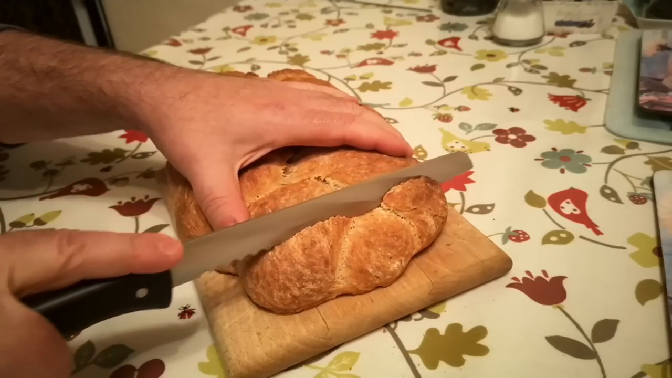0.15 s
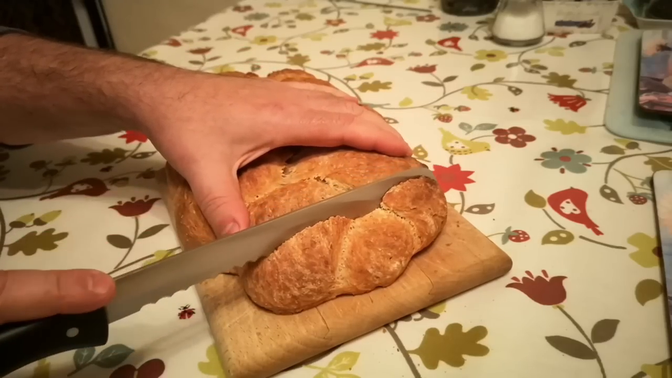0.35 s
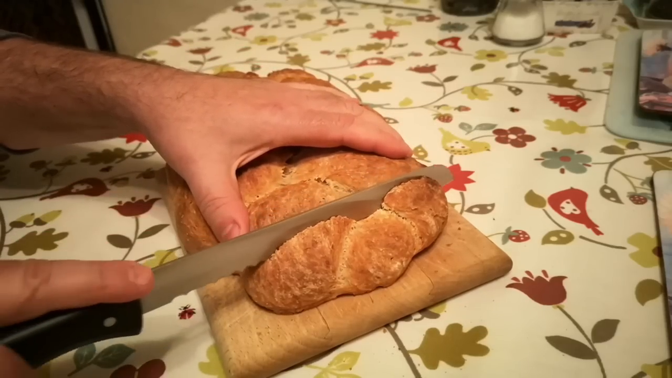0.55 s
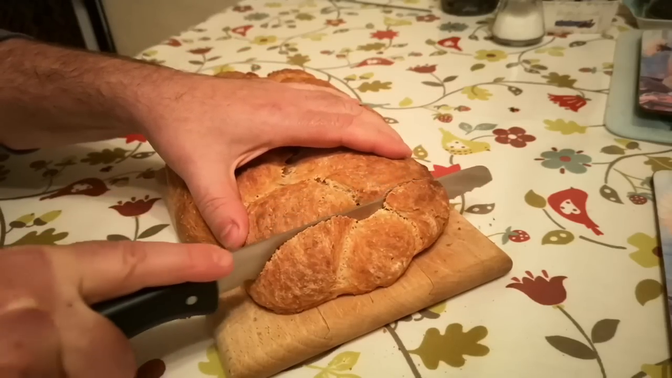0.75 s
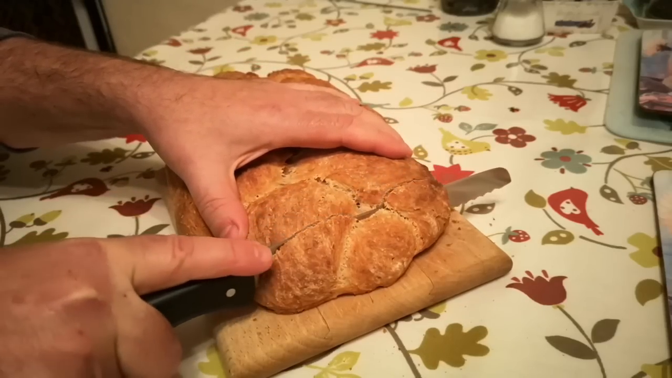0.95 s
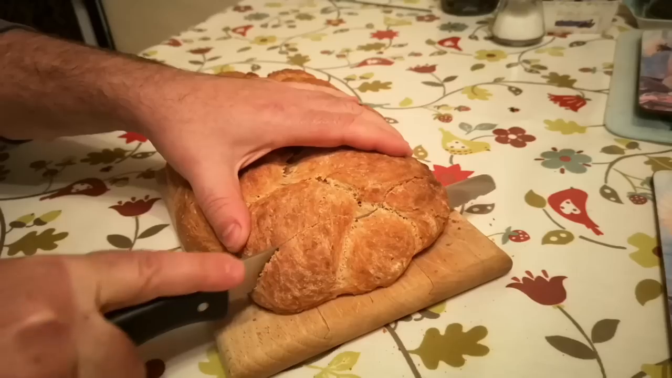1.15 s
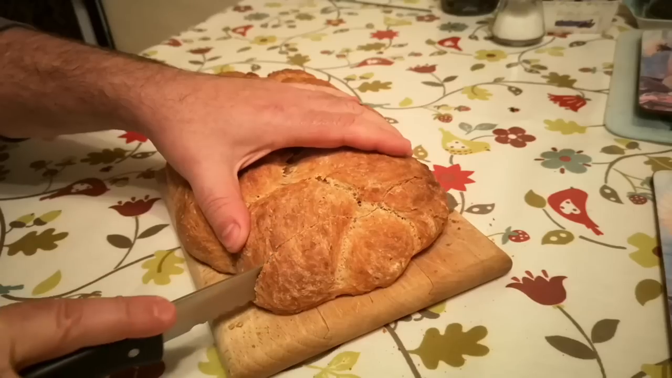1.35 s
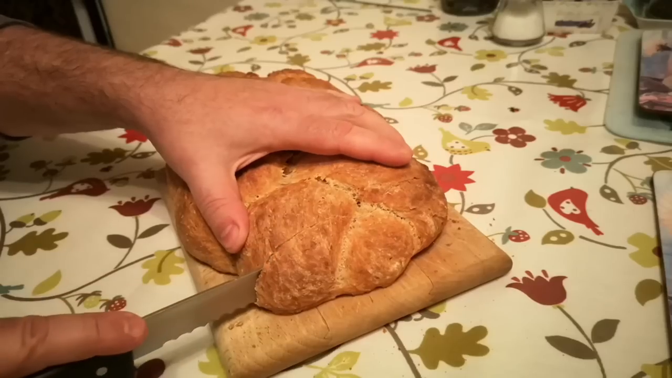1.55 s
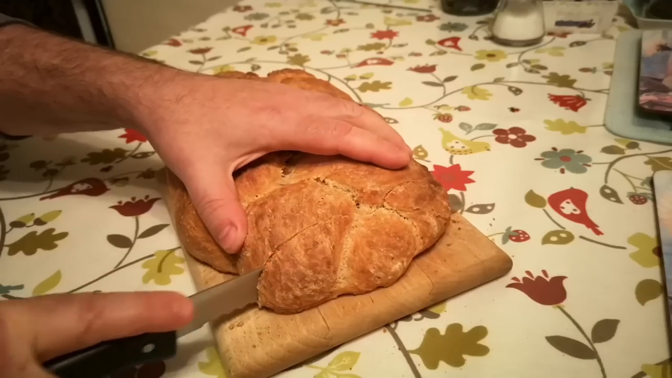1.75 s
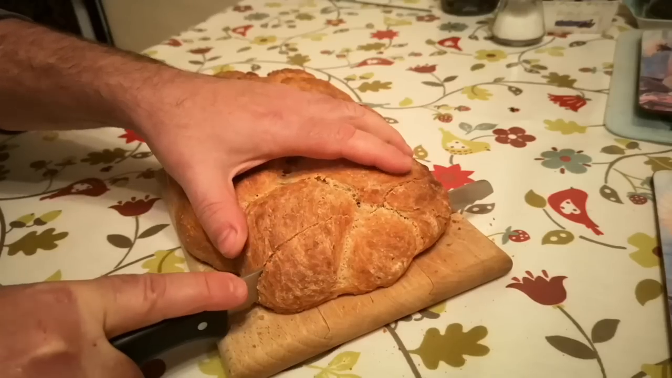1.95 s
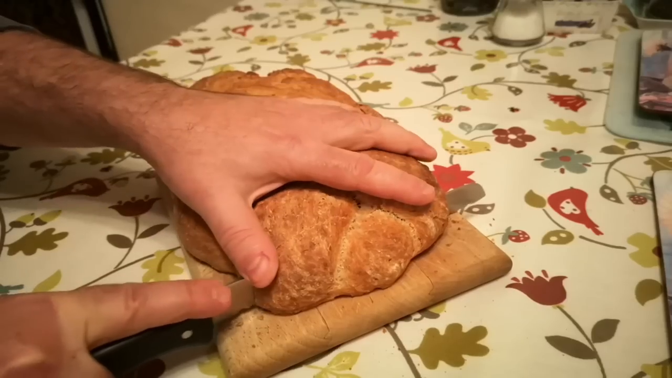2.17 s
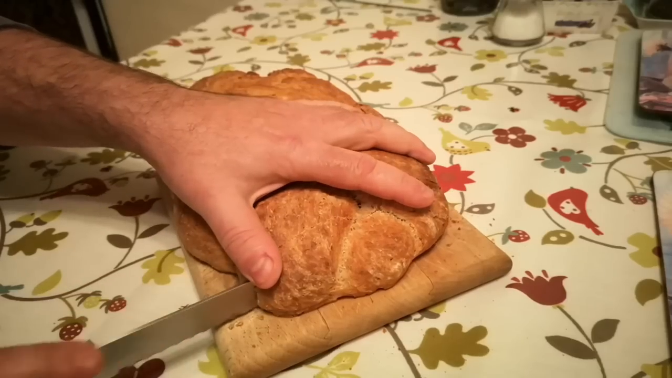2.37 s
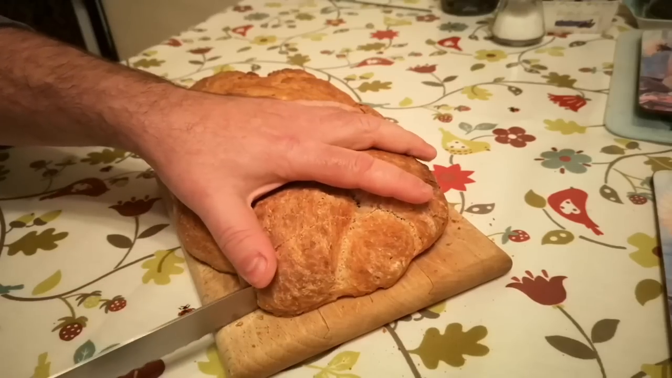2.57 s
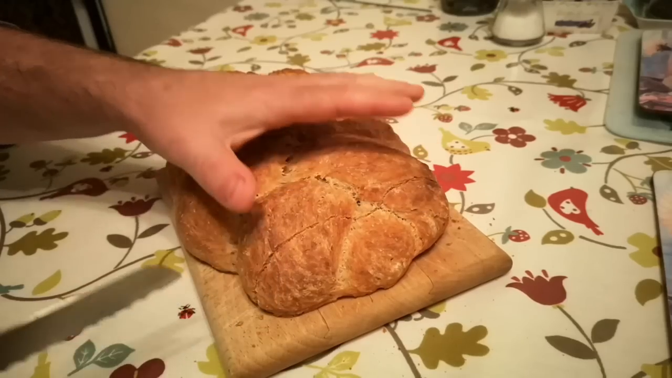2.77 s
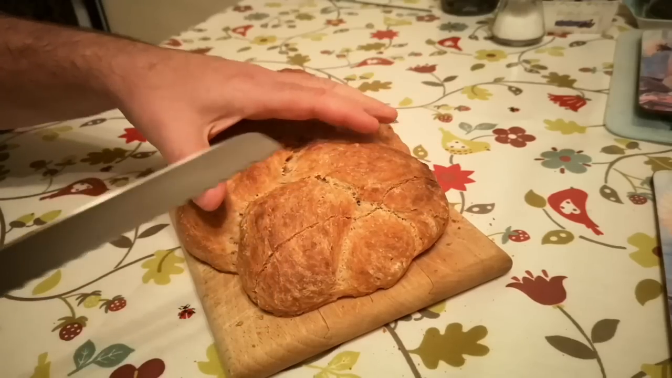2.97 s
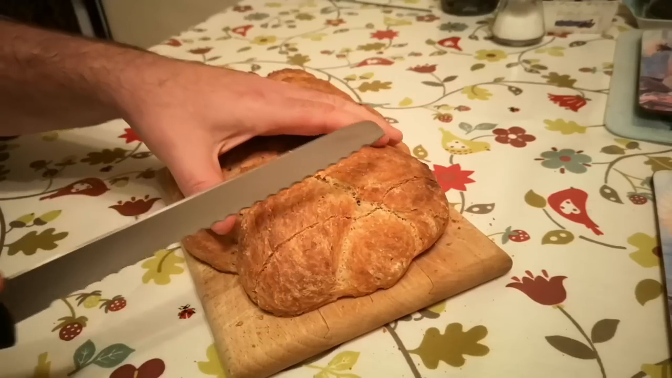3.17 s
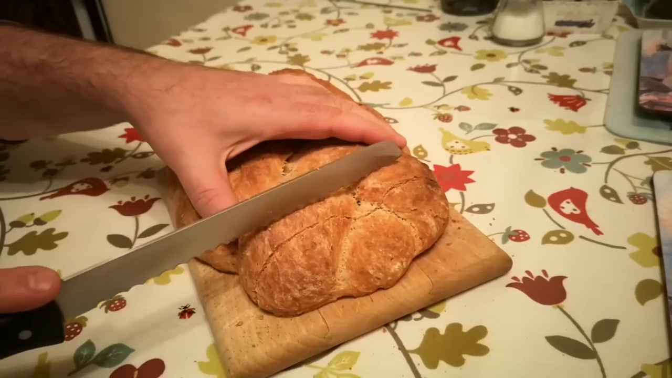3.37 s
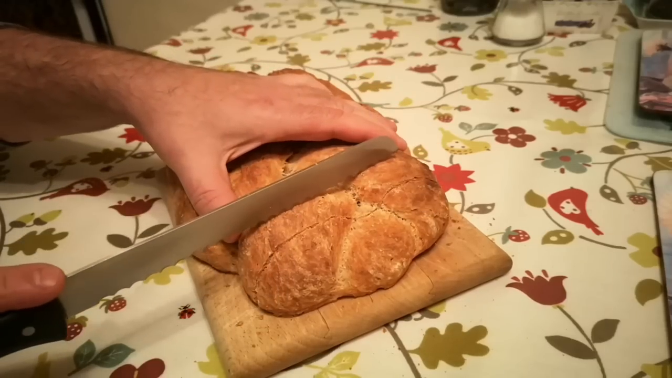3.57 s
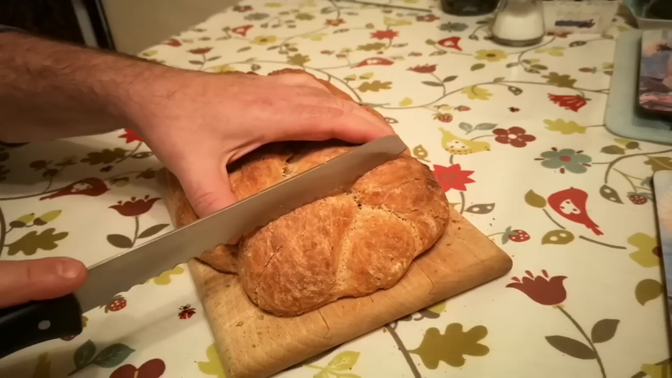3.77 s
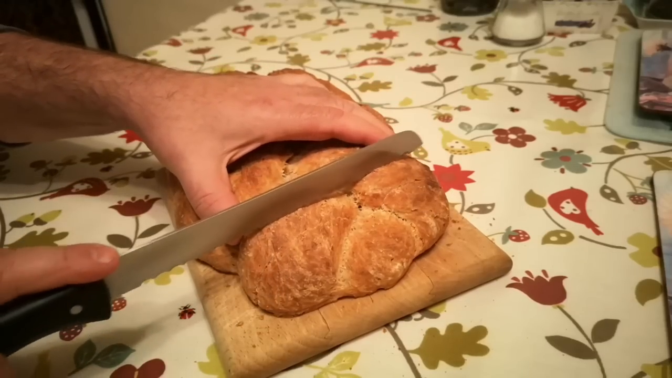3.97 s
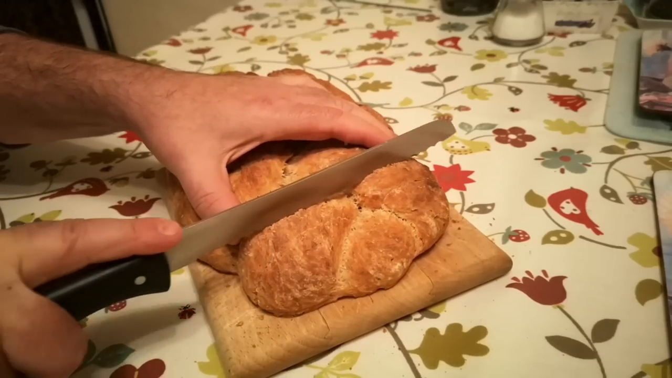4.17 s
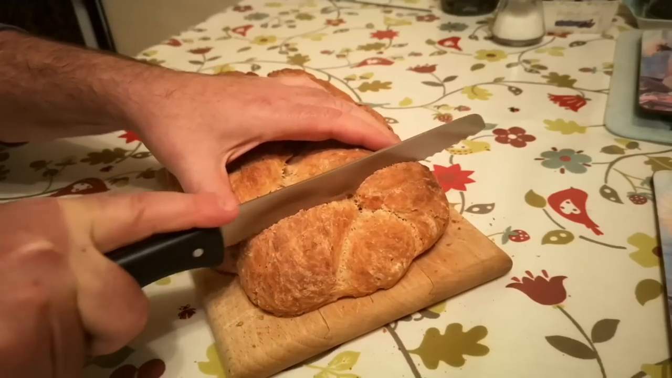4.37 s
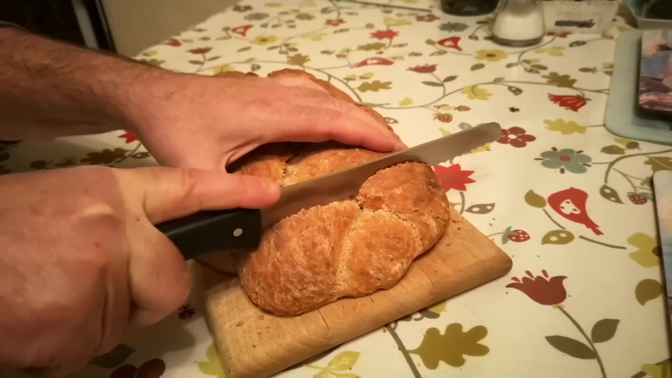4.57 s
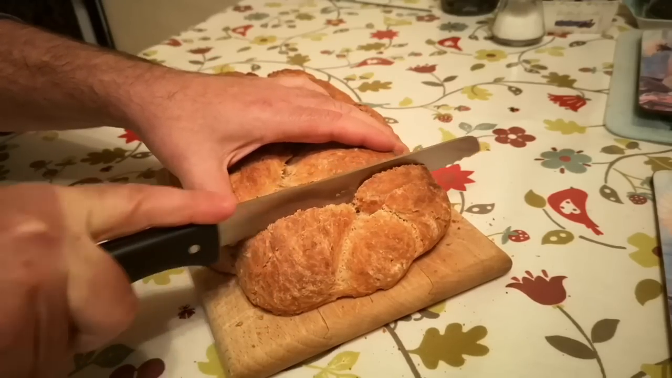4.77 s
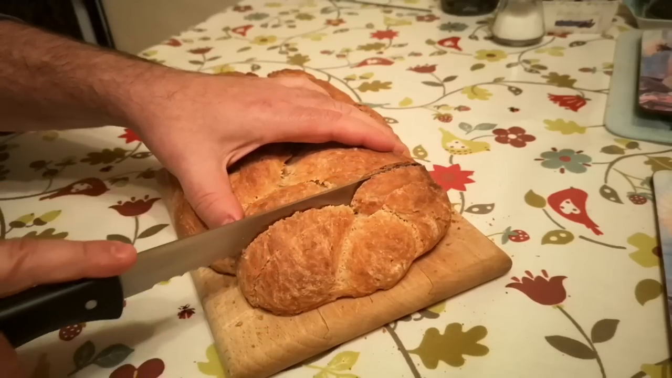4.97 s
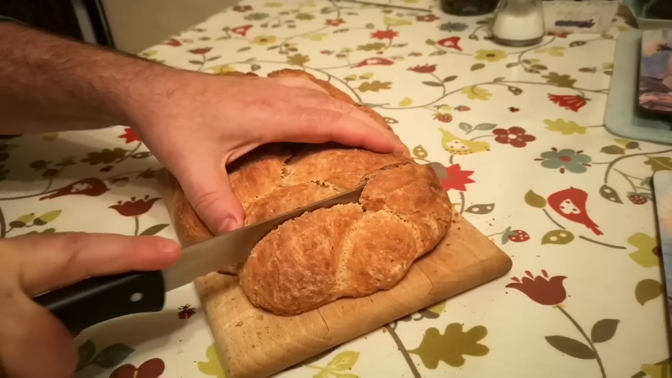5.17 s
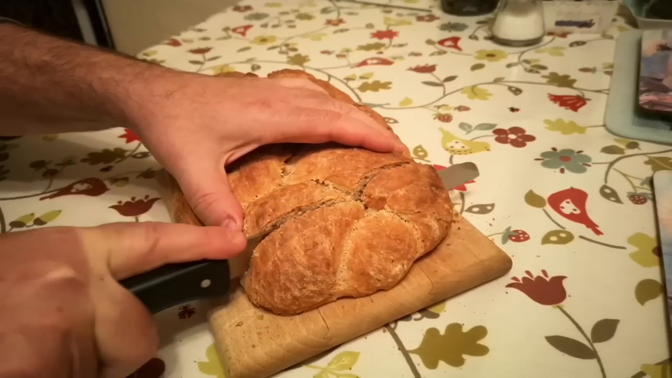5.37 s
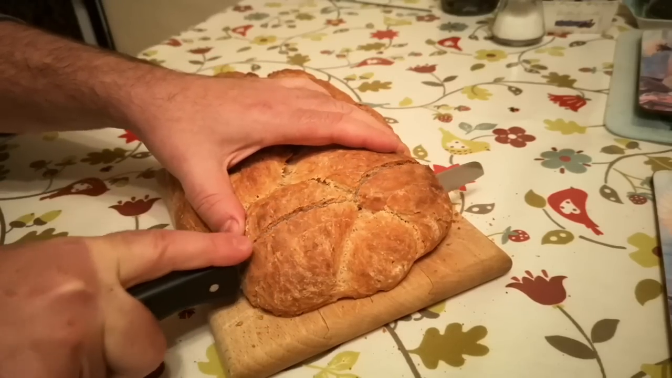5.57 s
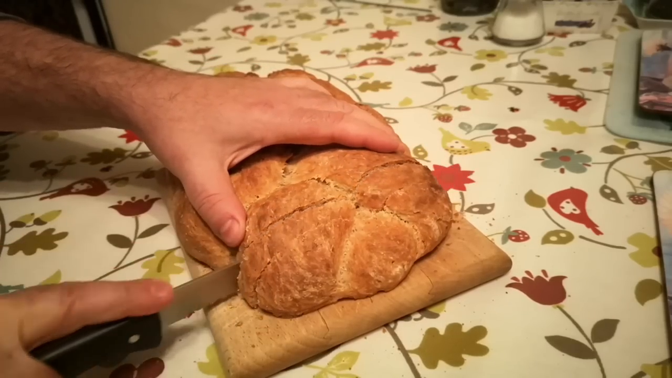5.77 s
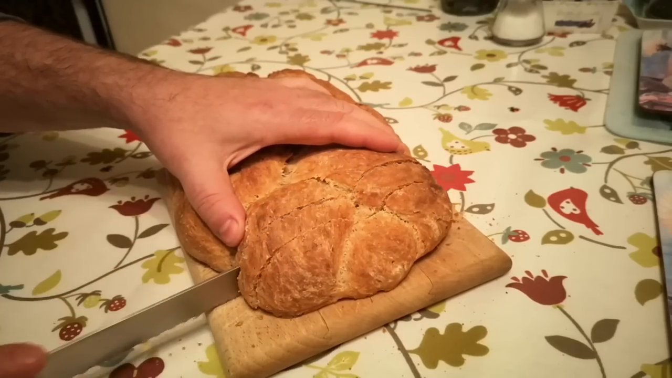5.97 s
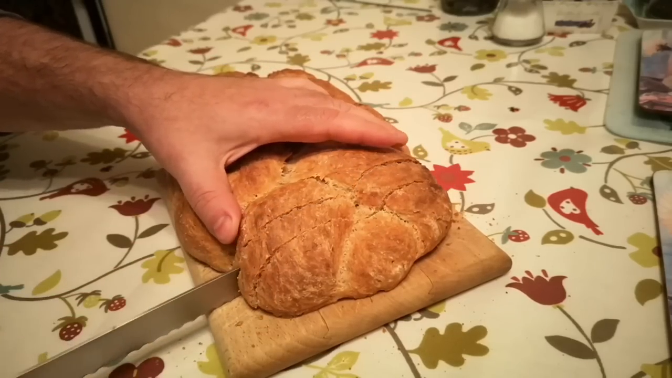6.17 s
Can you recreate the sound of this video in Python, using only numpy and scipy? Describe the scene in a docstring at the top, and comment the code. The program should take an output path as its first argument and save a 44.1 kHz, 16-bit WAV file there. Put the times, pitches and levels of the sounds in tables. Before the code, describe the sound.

Close up in a quiet kitchen, a serrated knife saws a crusty loaf on a wooden board. Crisp crackling strokes with sharp flake snaps come first, then softer rasping, a loud board knock at two seconds and a smooth hollow slide out. After a near-silent pause, a second cut crunches louder and fades into softer scraping.

```python
"""Sawing a crusty loaf

A serrated knife saws two cuts through a crusty loaf on a wooden board, close by in a quiet kitchen.
One train of random tooth catches drives showers of tiny cracks, the thrum of loaf and board, and a noisy rasp.
Noise bursts snap as larger flakes, crumbs tick, force pulses knock the board and resonators make the blade ring.
Deep in the cut the rasp turns smooth and hollow; reflections and soft noise place it all in the kitchen."""
import sys
import numpy as np
from scipy import signal
from scipy.io import wavfile
from scipy.ndimage import uniform_filter1d

SR = 44100
rng = np.random.default_rng(int(sys.argv[2]) if len(sys.argv) > 2 else 0)


def digitize_waveform(pressure):
    """Quantize a signal to 16-bit integers and store it at the path in sys.argv[1].

    Rows of a 2-D input are taken as channels; values are limited to [-1, 1].
    """
    field = np.atleast_2d(pressure).T
    bounded = np.clip(field, -1, 1)
    quanta = np.round(bounded * 32767).astype(np.int16)
    wavfile.write(sys.argv[1], SR, quanta)


N = 274522
TIME = np.arange(N) / SR


def gain_of(db):
    """Decibels to amplitude."""
    return 10 ** (np.asarray(db) / 20)


def evened(x):
    """Scales to rms 1."""
    return x / np.sqrt(np.mean(x ** 2) + 1e-20)


def peaked(x):
    """Scales to peak 1."""
    return x / (abs(x).max() + 1e-20)


def steadied(x, size=2000):
    """Holds the short-term rms near 1 and keeps the fast grain; size is in samples."""
    level = evened(x)
    power = uniform_filter1d(uniform_filter1d(level ** 2, size), size)
    return level / np.sqrt(abs(power) + 1e-4)


def blend(x, y, share):
    """Crossfades two sounds at even power."""
    share = np.clip(share, 0, 1)
    return np.sqrt(1 - share) * x + np.sqrt(share) * y


def read(points, hz):
    """Reads a spectrum or decay curve on a log-frequency axis."""
    f, value = np.transpose(points)
    return np.interp(np.log(hz + 1), np.log(f), value)


def follow(rows):
    """The columns of a curve table at every sample; the end values hold outside it."""
    s, *columns = np.transpose(rows)
    return [np.interp(TIME, s, column) for column in columns]


def swell(s, length_s):
    """A bell of height 1 around time s."""
    return np.exp(-2 * ((TIME - s) / length_s) ** 2)


def add(mix, s, sound):
    """Mixes a sound in at time s."""
    part = mix[max(round(s * SR), 0):][:len(sound)]
    part += sound[:len(part)]


def colour(x, points, size=8192):
    """Causal minimum-phase filter with the given spectrum."""
    hz = abs(np.fft.fftfreq(size, 1 / SR))
    log_gain = np.log(gain_of(read(points, hz)))
    taps = np.fft.ifft(np.exp(np.conj(signal.hilbert(log_gain)))).real
    return signal.oaconvolve(x, taps[:size // 2])[:len(x)]


def band(x, low_hz, high_hz):
    """Gentle band-pass."""
    edges = [low_hz, min(high_hz, SR / 2 - 1)]
    return signal.sosfilt(signal.butter(2, edges, "band", fs=SR, output="sos"), x)


def resonate(x, hz, width_hz):
    """A resonance of gain 1 whose pitch can follow a curve: shift to 0 Hz, smooth, shift back."""
    turn = np.exp(2j * np.pi * np.cumsum(hz * np.ones(len(x))) / SR)
    r = np.exp(-np.pi * width_hz / SR)
    return 2 * (turn * signal.lfilter([1 - r], [1, -r], x / turn + 1e-18)).real


def clicks(per_s, spread_db):
    """Random impulses, most small and a few large."""
    heights = gain_of(spread_db * np.minimum(rng.exponential(1, N), 4))
    return (rng.random(N) < per_s / SR) * heights


def linger(x, seconds):
    """Lets each impulse die away exponentially."""
    return signal.lfilter([1], [1, -np.exp(-1 / (seconds * SR))], x)


# spectrum of the quiet kitchen: f/Hz, relative level/dB
KITCHEN_SPECTRUM = [(25, -25), (174, 4), (554, -5.5), (1130, -8), (1860, -3), (3400, -10.5), (16000, -29.5)]


def kitchen_air(level_db=-57):
    """Steady noise shaped to the hush of the kitchen."""
    return gain_of(level_db) * evened(colour(rng.standard_normal(N), KITCHEN_SPECTRUM))


# strokes of the knife: start t/s, speeding up/s, full speed/s, slowing/s,
# level/dB of crust breaking, loaf shaking and blade rubbing (before the mix trims),
# drop/dB of the crackle once the teeth are through the crust
KNIFE_STROKES = [(-0.1, 0.056, 0.36, 0.18, -26.5, -22.5, -31.5, 4.5),
                 (0.553, 0.14, 0.13, 0.32, -27, -23, -32.5, 5.5),
                 (1.223, 0.089, 0.058, 0.26, -31, -28, -37, 6.5),
                 (1.739, 0.18, 0.026, 0.21, -30.5, -24, -28.5, 13),
                 (2.246, 0.23, 0.19, 0.13, -27, -23.5, -23, 12.5),
                 (3.94, 0.18, 0.57, 0.15, -23.5, -21, -33.5, 7),
                 (4.792, 0.13, 0.094, 0.2, -23, -23, -31, 7),
                 (5.199, 0.079, 0.25, 0.16, -31.5, -27, -35, 5),
                 (5.699, 0.3, 0.093, 0.29, -30, -24, -25.5, 31)]
# the blade snags and tears free: t/s, half-width/s of the swell,
# level/dB of crust breaking and loaf shaking (before the mix trims)
BLADE_SNAGS = [(0.416, 0.044, -35, -29.5), (0.708, 0.013, -21.5, -37), (0.862, 0.029, -29, -22),
               (1.032, 0.063, -41.5, -32), (1.475, 0.022, -29.5, -46), (1.663, 0.014, -45, -37),
               (2.481, 0.06, -31, -20), (2.733, 0.06, -44, -20), (3.838, 0.035, -49, -35),
               (4.432, 0.03, -25, -28), (4.506, 0.03, -24.5, -20.5), (4.628, 0.032, -28, -14),
               (5.765, 0.03, -33, -26.5)]
# how steeply each sound grows with blade speed (exponents)
CRUST_POWER, SHAKE_POWER, RUB_POWER = 1.26, 1.2, 1.434
# time for the teeth to pass the crust; share of the crackle's drop in dB that the shaking takes too
THROUGH_S, SHAKE_DROP_SHARE = 0.13, 0.31
# the blade still creeps around a stroke: share of full speed, and how fast that dies
CREEP, SETTLE_S = 0.062, 0.095
SHAKE_LAG_S = 0.0064  # the loaf rocks a little behind the blade
SNAG_RUB_DB = -2  # scrape of a snag, relative to its crackle


def sawing():
    """Amplitudes of crackle, shaking and rubbing: each follows stroke speed and jumps at a snag."""
    breaking, shake, rub = np.zeros((3, N))
    for start, rise, hold, fall, crust_db, shake_db, rub_db, drop_db in KNIFE_STROKES:
        corners = start + np.cumsum([0, rise, hold, fall])
        outside_s = abs(TIME - np.clip(TIME, corners[0], corners[-1]))
        creep = CREEP * np.exp(-outside_s / SETTLE_S)
        speed = np.hypot(np.interp(TIME, corners, [0, 1, 1, 0]), creep)
        late_speed = np.interp(TIME - SHAKE_LAG_S, TIME, speed)
        through_db = drop_db * np.clip((TIME - corners[1]) / THROUGH_S, 0, 1)
        breaking += gain_of(crust_db - through_db) * speed ** CRUST_POWER
        shake += gain_of(shake_db - SHAKE_DROP_SHARE * through_db) * late_speed ** SHAKE_POWER
        rub += gain_of(rub_db) * speed ** RUB_POWER
    for s, length_s, crust_db, shake_db in BLADE_SNAGS:
        tear = swell(s, length_s)
        breaking = np.hypot(breaking, gain_of(crust_db) * tear)
        shake = np.hypot(shake, gain_of(shake_db) * tear)
        rub = np.hypot(rub, gain_of(crust_db + SNAG_RUB_DB) * tear)
    return breaking, shake, rub


def uneven(swing_db=1.4, spot_s=0.012):
    """Hard and soft spots of crust pass under the teeth and swing the level."""
    spots = evened(linger(linger(rng.standard_normal(N), spot_s), spot_s / 3))
    return evened(gain_of(swing_db * spots))


# spectrum of breaking crust: f/Hz, relative level/dB
CRUST_SPECTRUM = [(150, -38), (500, -8), (1000, -35), (2000, -5), (3000, 0.5), (4000, -1.5), (5800, 1),
                  (7400, 4.5), (8500, -5), (10200, -15.5), (15000, -17.5), (17000, -30)]


def crackle(catches, shower_s=0.006, ring_hz=1100, ring_share=0.3, patchy_db=4, count=12):
    """Each catch frees a shower of tiny cracks; chips ring briefly, their pitch balance wandering."""
    shower = evened(linger(catches, shower_s)) + .25
    cracks = clicks(per_s=4000, spread_db=1.0) * shower * rng.choice([-1, 1], N)
    chip = rng.integers(0, count, N)  # the pitch that each crack rings at
    patches = evened(uniform_filter1d(rng.standard_normal((count, N)), size=1100))
    rings = np.zeros(N)
    for k, hz in enumerate(np.linspace(1200, 14500, count)):
        own_cracks = cracks * (chip == k) * gain_of(patchy_db * patches[k])
        rings += resonate(own_cracks, hz, ring_hz)
    return steadied(colour(ring_share * evened(rings) + 0.6 * evened(cracks), CRUST_SPECTRUM))


def crumbs(breaking, per_s=46, level_db=-27, power=0.62, spread_db=-5.5, tick_s=0.0016):
    """Loose crumbs tick on their own; the low power keeps them going where the blade turns round."""
    ticks = linger(clicks(per_s, spread_db), tick_s) * rng.standard_normal(N)
    return gain_of(level_db) * breaking ** power * evened(colour(ticks, CRUST_SPECTRUM))


# ringing modes of loaf, board and table: f/Hz, relative level/dB, t60/s
BOARD_MODES = [(75.4, -14, 0.49), (132.7, -1.5, 0.33), (182, -3.5, 0.11), (211.4, 3, 0.27),
               (285.3, -1.5, 0.17), (344, -9, 0.16), (359, -9, 0.1), (504.6, -8, 0.11), (826, -11, 0.048),
               (1004, -13.5, 0.14), (1307, -8, 0.11), (1695, -9, 0.054), (1894, -8.5, 0.068)]


def board(x):
    """The ring of loaf, board and table under a force: a sum of decaying modes."""
    t = TIME[:SR // 2]
    ring = sum(gain_of(db - 60 * t / t60) * np.cos(2 * np.pi * hz * t) for hz, db, t60 in BOARD_MODES)
    return signal.oaconvolve(x, ring)[:len(x)]


# hollow hum, strongest as the blade leaves the loaf: t/s, f/Hz, share of the shaking (0-1)
EXIT_HUM = [(2.36, 292, 0.16), (2.47, 235, 0.33), (2.52, 329, 0.55), (2.6, 555, 0.13), (2.67, 473, 0.23),
            (2.725, 305, 0.63), (2.765, 182, 1), (2.86, 172, 0.25), (3.3, 170, 0.1)]


def hollow_hum(width_hz=70):
    """Noise through two gliding resonances; returns the hum and its share of the shaking."""
    hum_hz, share = follow(EXIT_HUM)
    hum = resonate(rng.standard_normal(N), hum_hz, width_hz)
    hum = resonate(hum, hum_hz, 2 * width_hz)
    hum = band(band(hum, 118, 1010), 108, 2000)
    return steadied(hum, size=1100), share


# spectrum of the loaf being pushed about: f/Hz, relative level/dB
PUSH_SPECTRUM = [(45, -35), (66, -3), (100, 1), (130, 6), (220, 1), (370, -8.5), (500, -22), (900, -25.5),
                 (3000, -51)]


def shaking(catches, jolt_s=0.0026, ring_db=1, drag=1.0, light_hz=165):
    """The catches tug at the loaf, which thrums on the board; a smooth slide thins the deepest part."""
    tugs = evened(linger(catches, jolt_s)) + drag * rng.standard_normal(N)
    dragging = (evened(linger(catches, 0.016)) + drag) * rng.standard_normal(N)
    ringing = evened(band(board(tugs - tugs.mean()), 91.0, 2200))
    thrum = evened(colour(dragging, PUSH_SPECTRUM)) + gain_of(ring_db) * ringing
    sliding = np.clip(6 * follow(SLIT_CURVE)[1], 0, 1)
    light = signal.sosfiltfilt(signal.butter(3, light_hz, "high", fs=SR, output="sos"), thrum)
    thrum = steadied((1 - sliding) * thrum + sliding * light, size=1700)
    hum, share = hollow_hum()
    return blend(thrum, hum, share)


# spectrum of the blade's rasp: f/Hz, relative level/dB
RUB_SPECTRUM = [(150, -12), (550, -3.5), (750, -3.5), (1000, 1), (1200, -2), (1800, -2), (2700, 2),
                (3500, -12), (8000, -17.5), (12000, -52)]
# the blade sliding deep in the cut: t/s, slit resonance f/Hz, smooth share of the rubbing (0-1)
SLIT_CURVE = [(1.75, 1590, 0.07), (1.95, 1710, 0.16), (2.02, 1580, 0.83), (2.15, 1560, 0.4),
              (2.39, 1520, 0.4), (2.5, 1550, 0.73), (2.56, 1790, 0.4), (2.72, 1920, 0.1), (3.7, 1750, 0.05),
              (5.85, 1650, 0.04), (6.05, 1800, 0.17)]


def rubbing(catches, scrape_s=0.012, grip_between=0.33, sliding=6, slit_width_hz=260,
            overtone=1.39, overtone_db=-5, wood_share=0.083):
    """The blade scrapes the cut and rings the board; a slide smooths the scrape and the slit resonates."""
    slit_hz, share = follow(SLIT_CURVE)
    grip = evened(linger(catches, scrape_s)) + grip_between + sliding * np.maximum(share, 0)
    grit = clicks(per_s=3500, spread_db=0.5) * grip * rng.choice([-1, 1], N)
    rasp = colour(grit, RUB_SPECTRUM)
    woody = blend(steadied(rasp), steadied(band(board(rasp), 710, 3200)), wood_share)
    upper = resonate(rasp, overtone * slit_hz, slit_width_hz)
    hollow = resonate(rasp, slit_hz, slit_width_hz) - gain_of(overtone_db) * upper
    return steadied(blend(woody, steadied(hollow), share))


# larger flakes of crust snapping: t/s, level/dB (before snap_db), f/Hz,
# dull crunch/dB relative (before crunch_db), sharp edge/dB relative (before edge_db)
FLAKE_SNAPS = [(0.174, -16, 7040, -5, -4), (0.3361, -6.5, 7200, -8.5, -1), (0.3711, -12, 8000, -6, -5),
               (0.5582, -21.5, 7100, -8.5, -18), (0.754, -14, 5700, -1, -14), (0.7747, -15, 6870, -20, -13),
               (0.796, -7, 6600, -22, -14), (0.838, -12.5, 5900, 0, -22), (0.9027, -14, 7150, -8, -15),
               (1.0433, -19.5, 7100, -12, -13), (1.1253, -22, 6920, -13, -42.5),
               (1.37, -5.5, 6830, -13, -19.5), (1.428, -9.5, 7170, -11.5, -15),
               (1.652, -24.5, 3060, -11, -27), (1.9349, -17, 6440, 3.5, -21), (2.2957, -18, 6722, -4, -16),
               (2.421, -7, 7660, -11, -28), (2.4504, -7, 6830, -16.5, -23), (2.4801, -9, 6300, -7, -15),
               (2.5076, -15, 6900, -13, -24), (3.521, -40.5, 6560, -8, -14),
               (3.8257, -17, 7100, -11.5, -30), (3.9615, -15.5, 6730, -18, -34),
               (4.0122, -11.5, 7060, -9.5, -28), (4.07, -7, 6830, -9.5, -9), (4.086, -19, 2980, -8, -4),
               (4.1579, -10, 5850, -6.5, -11), (4.2677, -9.5, 7460, -12, -24),
               (4.3356, -12.5, 7300, -12, -14), (4.4549, -7, 6300, -6.5, -7.5),
               (4.6009, -6.5, 6500, -4.5, -6), (4.623, -3.5, 7160, -18, -14.5), (4.9162, -11, 6700, -5, -6),
               (4.951, -8.5, 5900, -8.5, 2), (5.0658, -7.5, 3000, -7.5, -9), (5.122, -4.5, 7640, -10, -13),
               (5.313, -16, 4900, 1, -23), (5.3852, -16, 6000, -2, -25), (5.4221, -21, 5900, 4, -22),
               (5.579, -15.5, 5600, -1.5, -29), (5.819, -12.5, 7160, -22, -26),
               (5.9584, -9, 6000, -2.5, -14)]


def snaps(crumble_s=0.0047, snap_db=1, crunch_db=0, edge_db=-3, kick_db=-12):
    """A flake tears in about a millisecond amid faint cracks, rings, crumbles and kicks the loaf."""
    out, kicks = np.zeros(N), np.zeros(N)
    t = np.arange(-SR // 100, SR // 50) / SR  # starts before the tear
    tear = np.exp(-(t / .0006) ** 2) + .09 * np.exp(-abs(t) / .003)
    crumble = np.exp(np.minimum(2 * t / crumble_s, -t / crumble_s))
    for s, db, flake_hz, dull_db, sharp_db in FLAKE_SNAPS:
        a, b, c = rng.standard_normal((3, len(t)))
        ring = resonate(band(a * tear, 0.92 * flake_hz, 1.114 * flake_hz), flake_hz, 820)
        flake = peaked(ring) + peaked(band(b * tear, 3500, 6800))
        edge = peaked(band(c * tear, 8200, 15000))
        crunch = peaked(band(b * crumble, 840, 3120))
        crack = peaked(peaked(flake) + gain_of(sharp_db + edge_db) * edge)
        add(out, s + t[0], gain_of(db + snap_db) * (crack + gain_of(dull_db + crunch_db) * crunch))
        add(kicks, s, gain_of([db + dull_db + kick_db]))
    return out + band(board(kicks), 120, 2400) / 2


# knife and loaf bumping the board: t/s, peak level/dB (before knock_db), time to peak force/ms
BOARD_KNOCKS = [(1.994, -1, 0.22), (2.276, -27, 0.36), (3.468, -40, 0.76), (3.5893, -23.5, 0.087),
                (3.689, -39, 1), (3.769, -38, 1), (5.579, -15.5, 0.12)]


def knocks(ring_db=-3, knock_db=0, clack_db=-20):
    """A blunt push and rebound, then the board rings; a shorter contact is brighter."""
    out, t = np.zeros(N), TIME[:SR // 2]
    for s, db, contact_ms in BOARD_KNOCKS:
        u = t * 1000 / contact_ms
        force = u * np.exp(-u)
        clack = peaked(band(rng.standard_normal(len(t)) * np.exp(-u / 70), 410, 1260))
        blow = peaked(band(force, 160, 376)) + gain_of(clack_db) * clack / contact_ms
        add(out, s, gain_of(db + knock_db) * peaked(blow + gain_of(ring_db) * peaked(board(force))))
    return out


# the blade rings or squeaks where the crust grips it: t/s, half-width/s of the swell, f/Hz, level/dB
BLADE_RINGS = [(2.078, 0.0844, 1570, -45.5), (2.556, 0.029, 1820, -20.5), (2.616, 0.16, 6870, -47),
               (4.027, 0.11, 7380, -38), (4.4, 0.24, 7240, -47), (5.067, 0.1, 2940, -36),
               (6.068, 0.15, 7100, -47)]


def singing(catches, width_hz=85, skirt_hz=450):
    """Tooth catches set the blade ringing in fits and starts, at a pitch set by where it is gripped."""
    out = np.zeros(N)
    for s, length_s, hz, db in BLADE_RINGS:
        tone = resonate(resonate(catches, hz, width_hz), hz, skirt_hz)
        out += gain_of(db) * swell(s, length_s) * steadied(tone)
    return out * uneven()


# decay of the room: f/Hz, t60/s
ROOM_DECAY = [(120, 0.3), (1800, 0.28), (15000, 0.062)]


def room(x, first_s=.005):
    """Sparse reflections from the kitchen, each band dying at its own speed."""
    t = TIME[:SR // 2]
    taps = rng.choice([-1., 1.], len(t)) * (rng.random(len(t)) < 1 / 10) * (t > first_s)
    hz, s, bins = signal.stft(taps, SR, nperseg=256)
    decay = gain_of(-60 * s / read(ROOM_DECAY, hz)[:, None])
    tail = signal.istft(bins * decay, SR, nperseg=256)[1]
    return signal.oaconvolve(x, tail / np.linalg.norm(tail))[:N]


def scene(crackle_db=-1.0, shake_db=0.32, rub_db=0, room_db=-14):
    """One train of tooth catches drives crackle, thrum, scrape and singing; the other layers join."""
    catches = clicks(per_s=130, spread_db=5.5)
    breaking, shake, rub = sawing()
    cracks = gain_of(crackle_db) * breaking * crackle(catches)
    thrum = gain_of(shake_db) * shake * shaking(catches)
    scrape = gain_of(rub_db) * rub * rubbing(catches)
    cutting = thrum + (cracks + scrape) * uneven()
    dry = cutting + crumbs(breaking) + snaps() + knocks() + singing(catches)
    return (dry + gain_of(room_db) * room(dry) + kitchen_air())[None]


def record(dry, bass_hz=52, ceiling=.85, edge_hz=15700):
    """The recorder cuts the deep bass, rounds off the highest peaks and limits the band."""
    thinned = signal.sosfilt(signal.butter(4, bass_hz, "high", fs=SR, output="sos"), dry)
    rounded = thinned / (1 + (thinned / ceiling) ** 6) ** (1 / 6)
    low_pass = signal.firwin(201, edge_hz, window=("kaiser", 8), fs=SR)
    return signal.oaconvolve(rounded, low_pass[None], "same")


dry = scene()
out = record(dry)
digitize_waveform(out)
```